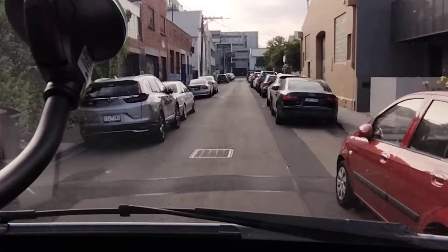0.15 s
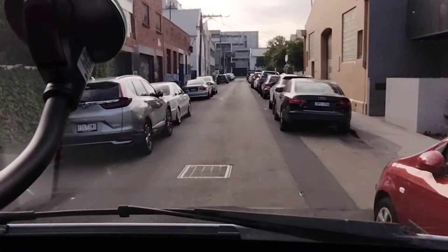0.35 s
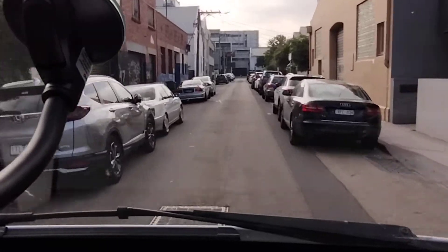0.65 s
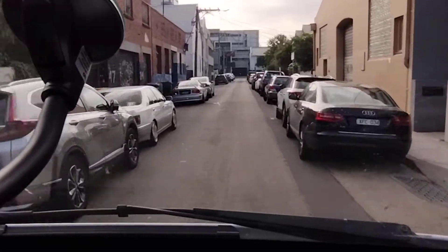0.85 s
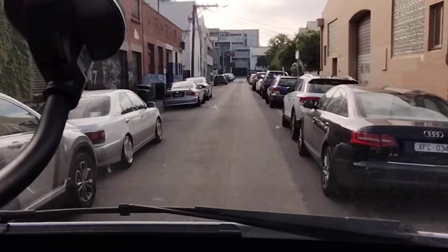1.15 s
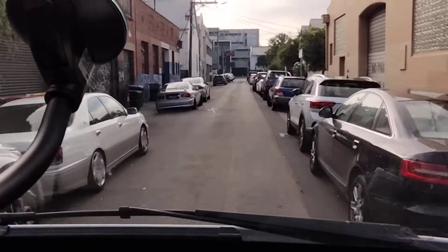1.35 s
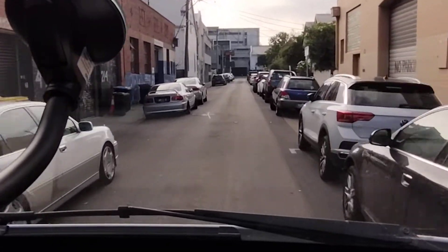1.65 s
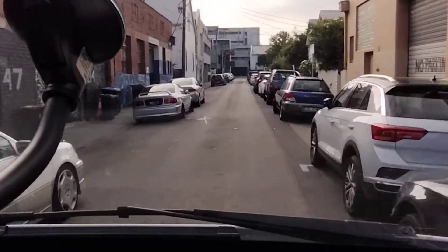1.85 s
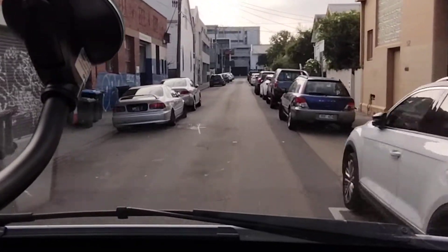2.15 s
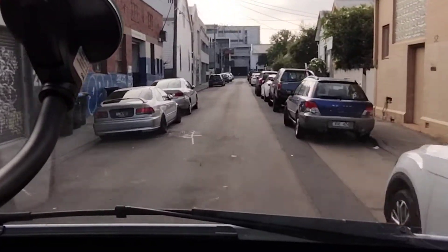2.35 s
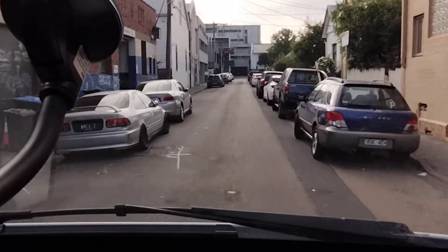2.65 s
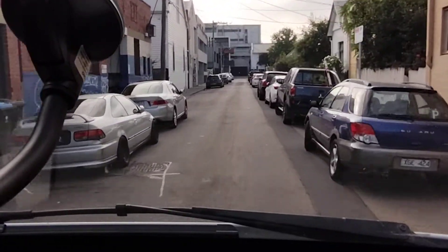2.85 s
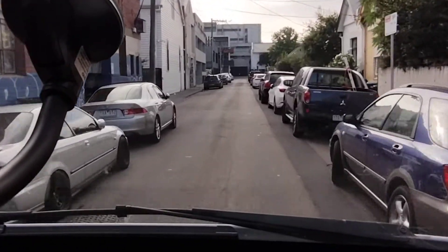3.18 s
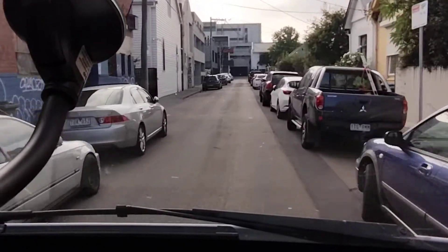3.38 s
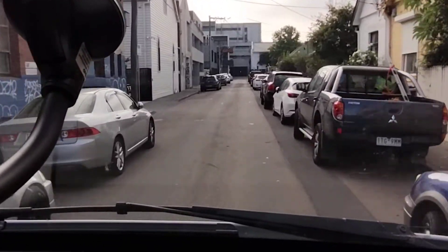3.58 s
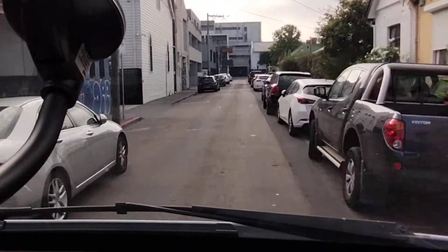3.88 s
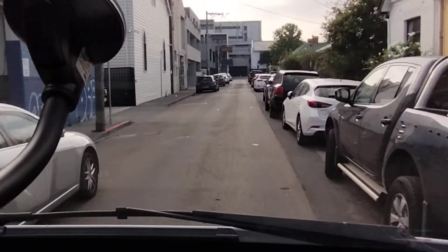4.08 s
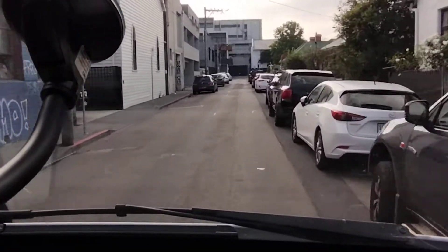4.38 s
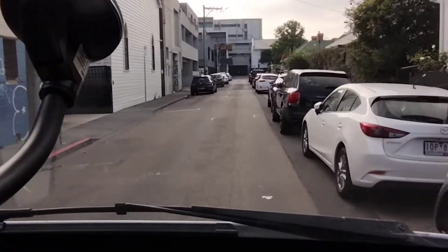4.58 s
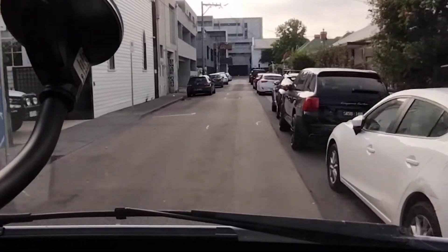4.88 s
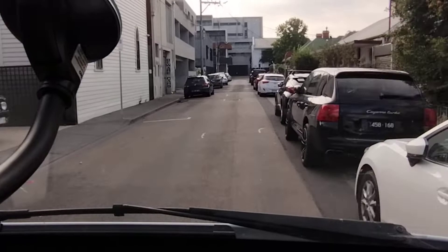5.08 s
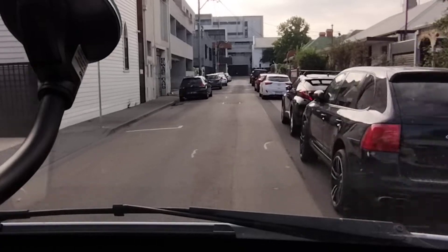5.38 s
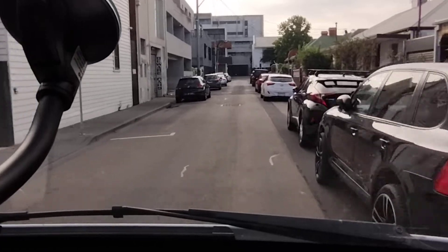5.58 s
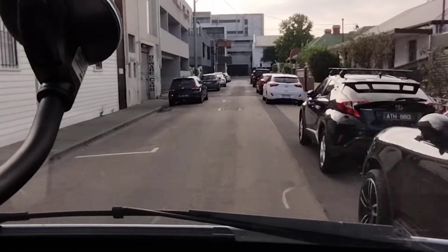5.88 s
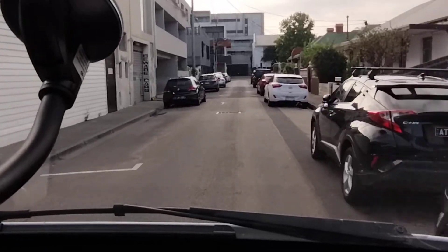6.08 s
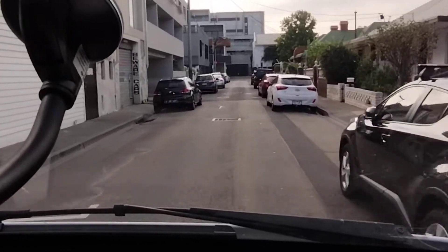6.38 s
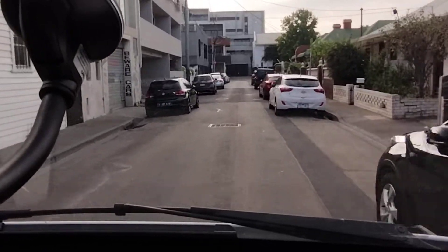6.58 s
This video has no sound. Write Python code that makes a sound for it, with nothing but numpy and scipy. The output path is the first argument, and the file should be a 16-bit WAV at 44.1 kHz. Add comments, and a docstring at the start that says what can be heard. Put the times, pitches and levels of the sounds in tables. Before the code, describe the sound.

A vehicle rolls slowly down a narrow street, heard from within the cabin. Low engine hum and muffled tyre roar sit under a thin hiss. Early bumps make the body boom and heave so hard that the whole sound briefly ducks; loose trim buzzes and rustles. After the revs fall, the ride calms, with a hollow tyre note swelling and fading and scattered small jolts.

```python
"""Narrow street, inside the cabin of a slowly rolling vehicle, one microphone behind the windscreen.
Shaped noise makes the rocking, cabin murmur, tyre drone, roar and hiss; most follow the road's roughness.
Sine tones make the engine orders, which drop once to lower revs, the whine, heaves, booms and tyre ring.
Short bursts make faint rustles and hiss, squeaks, buzzes of trim, jolts and tyre moans.
The biggest bass swings push the recorder's limiter, which ducks everything."""
import sys
import numpy as np
from scipy import signal
from scipy.fft import rfft, irfft, next_fast_len
from scipy.io import wavfile
from scipy.ndimage import uniform_filter1d

SR = 44100
rng = np.random.default_rng(int(sys.argv[2]) if len(sys.argv) > 2 else 0)


def wav_out(sig):
    """Save sig, one row per channel (or a flat mono array), as 16-bit PCM at SR to the path in sys.argv[1]."""
    wavfile.write(sys.argv[1], SR, np.round(np.clip(np.atleast_2d(sig).T, -1, 1) * 32767).astype(np.int16))


N = 297189
TIME, BINS = np.arange(N) / SR, np.fft.rfftfreq(N, 1 / SR)  # s, Hz

# All layer and event levels are set ahead of the limiter; spectra give relative levels.


def amp(db):
    """Decibels to gain."""
    return 10 ** (np.asarray(db) / 20)


def unit(x):
    """Scales to rms 1."""
    return x / np.sqrt(np.mean(x ** 2) + 1e-20)


def curves(rows):
    """Each column of a table after the time, joined by straight lines."""
    times, *columns = np.transpose(rows)
    return [np.interp(TIME, times, column) for column in columns]


def bell(x, centre, width):
    """A smooth hump, half as high at the ends of its width."""
    return .5 ** ((2 * (x - centre) / width) ** 2)


def noise(spectrum, resonances=()):
    """Noise of rms 1 with a broad colour and resonant peaks."""
    hz, db = np.transpose(spectrum)
    colour_db = np.interp(np.log(BINS + 1), np.log(hz + 1), db)
    colour_db = colour_db + sum(peak_db * bell(BINS, f, width) for f, width, peak_db in resonances)
    white = rfft(rng.standard_normal(N))
    return unit(irfft(white * amp(colour_db), N))


def drift(rate_hz):
    """A random wander of rms 1: noise whose spectrum is down to half amplitude at the rate."""
    size = next_fast_len(N, True)
    white = rfft(rng.standard_normal(size))
    lowpass = bell(np.fft.rfftfreq(size, 1 / SR), 0, 2 * rate_hz)
    return unit(irfft(white * lowpass, size)[:N])


def steadied(x, seconds):
    """Evens out the slow swells of a vibration by dividing by its local strength."""
    window = signal.windows.hann(int(seconds * SR))
    coverage = signal.fftconvolve(np.ones(N), window, "same")
    power = signal.fftconvolve(x ** 2, window, "same") / coverage
    return x / np.sqrt(abs(power) + 0.012)


def tone(hz, wander, rate_hz):
    """A vibration of rms 1 whose pitch wanders by a given share."""
    turns = np.cumsum(hz * (1 + wander * drift(rate_hz))) / SR
    return unit(np.sin(2 * np.pi * (turns + rng.random())))


def swells(rows):
    """Strength that builds and dies away with each event; overlapping events add in power."""
    return np.sqrt(sum(amp(db) ** 2 * bell(TIME, s, length) for s, length, *_, db in rows))


def fuzzy_notes(rows, width_hz):
    """Brief notes of an unevenly driven resonance, blurred in level and phase."""
    fuzz = drift(width_hz) + 1j * drift(width_hz)
    fuzz = fuzz / np.sqrt(abs(fuzz) ** 2 + .5)  # limits the strong swells
    total = np.zeros(N)
    for s, length, hz, db in rows:
        note = unit((fuzz * np.exp(2j * np.pi * hz * TIME)).real)
        total += amp(db) * bell(TIME, s, length) * note
    return total


# Road surface, rough just after a hump, then smoother: t/s, level/dB (roughness)
ROUGHNESS = [(0, 5), (.3, 2), (.8, 3.5), (1.1, -2), (1.4, 3), (1.57, 0), (1.73, 3), (2.8, 0.5), (3.5, -1),
             (3.8, 0), (4.4, -0.5), (5, 0), (5.65, 1), (5.9, -0.5), (6.74, -1.5)]


def roughness_db():
    """How hard the road drives the vehicle; 0 dB is ordinary asphalt."""
    return curves(ROUGHNESS)[0]


# Colour of the shaking body: f/Hz, level/dB
SHAKE_SPECTRUM = [(4, -35.5), (10, -17.5), (16, 1), (21, 3), (25, 0), (31, -16), (48, -37.5), (160, -110)]
# Colour of a large throbbing panel: f/Hz, level/dB
PANEL_SPECTRUM = [(25, -19), (33, 2.5), (41, -5.5), (47, -13.5), (65, -22.5), (200, -110)]


def rocking():
    """Uneven asphalt shakes the body and a large panel, as low noise that follows the roughness."""
    shake = steadied(noise(SHAKE_SPECTRUM), seconds=.1)
    panel = steadied(noise(PANEL_SPECTRUM), seconds=0.022)
    level_db = -26 + 0.87 * roughness_db()
    return amp(level_db) * (shake + amp(-3.5) * panel)


# Colour of the low, slowly wavering murmur in the cabin: f/Hz, level/dB
MURK_SPECTRUM = [(35, -25.5), (52, -4.5), (62, -6), (68, -10.5), (78, -5.5), (92, -12.5), (120, -42),
                 (400, -100)]


def murk():
    """A low murmur of the cabin air whose level wavers slowly at random."""
    level_db = -33.5 + 3.5 * drift(rate_hz=2)
    return amp(level_db) * steadied(noise(MURK_SPECTRUM), seconds=0.21)


# Bumps that set the cabin air booming: t/s, length/s (at half power), level/dB
BOOM_EVENTS = [(0, 0.029, -17), (.37, 0.045, -27), (1.02, 0.083, -24.5), (1.155, 0.1, -17.5),
               (1.38, 0.074, -27), (1.66, 0.096, -24), (2.2, .05, -26), (2.43, 0.074, -25),
               (2.71, 0.079, -23.5), (3.23, 0.15, -30), (3.89, 0.085, -24.5), (4.19, 0.035, -35),
               (4.41, 0.1, -26), (4.67, 0.082, -23), (5.49, 0.091, -28), (6.06, 0.088, -26),
               (6.55, 0.099, -22.5)]


def booms():
    """Bumps pump the lowest air mode of the cabin, a wandering tone around 69 Hz."""
    return swells(BOOM_EVENTS) * tone(69, wander=.055, rate_hz=14.04)


# Colour of the tyre casings through the suspension: f/Hz, level/dB
DRONE_SPECTRUM = [(60, -31), (98, -3), (112, -2), (140, 1), (172, -2.5), (200, -2), (225, -3.5),
                  (250, -6.5), (280, -7.5), (305, -15), (450, -34.5), (900, -87.5)]


def drone():
    """The tyre casings drone through the suspension, following the roughness."""
    level_db = -34.5 + 1.06 * roughness_db()
    return amp(level_db) * steadied(noise(DRONE_SPECTRUM), seconds=0.43)


# Colour of the tread through the panels: f/Hz, level/dB
ROAR_SPECTRUM = [(150, -22.5), (300, -0.5), (410, 0.5), (470, -2), (530, -3), (580, -8.5), (760, -6),
                 (860, -10.5), (1050, -11), (1400, -12), (1650, -20), (2500, -42), (6000, -80)]
# Cabin resonances, also heard on the air and the jolts: f/Hz, width/Hz, level/dB
CABIN_PEAKS = [(604, 39, 5), (710, 25, 4), (773, 40, 3), (1157, 32, 6.5), (1265, 32, 3), (1400, 45, 4),
               (1620, 31, 4.5), (2153, 150, 3.5), (3100, 240, 2.5), (5040, 250, 0.5)]


def roar():
    """The tread roars through the panels, fluttering with the road grain."""
    flutter_db = 0.61 * drift(rate_hz=26)
    level_db = -41.5 + 0.46 * roughness_db() + flutter_db
    return amp(level_db) * noise(ROAR_SPECTRUM, CABIN_PEAKS)


# The air inside the tyres rings on one note: t/s, level/dB
CAVITY_LEVEL = [(0, -49.5), (1.6, -51), (1.8, -39), (2.2, -39.5), (2.45, -48), (2.65, -39.5), (3.05, -41.5),
                (3.4, -38.5), (4.25, -45), (4.6, -35), (4.98, -44), (5.2, -38), (5.6, -38.5), (6.1, -47),
                (6.35, -48.5), (6.74, -38)]


def cavity():
    """The tyre air rings near 209.5 Hz, swelling and fading on its own course, much stronger after 1.7 s."""
    return amp(curves(CAVITY_LEVEL)[0]) * tone(209.5, wander=.006, rate_hz=4.87)


# Crank rate, dropping once as at a gear change: t/s, f/Hz
CRANK_RATE = [(0, 27.6), (1.5, 27.8), (1.75, 22.6), (2.45, 20.15), (5, 20.2), (6.74, 20.15)]
# Engine orders: multiple of the crank rate, full from t/s, full until t/s, level/dB
ENGINE_ORDERS = [(4, 0, 1.5, -37.5), (5, 0, 1.5, -41), (10, 0, 1.55, -43.5), (11, 0, 1.5, -52),
                 (12, 0, 1.5, -51), (14, 0, 1.5, -52), (2, 2.3, 6.8, -32), (6, 2.4, 6.8, -46),
                 (8, 2.3, 3.1, -43), (8, 3.25, 6.8, -40.5), (14, 2.4, 6.8, -46), (15, 2.4, 6.8, -54)]


def engine():
    """Crank orders, each wavering a little; the cabin picks out other ones once the revs drop."""
    crank_hz = curves(CRANK_RATE)[0]
    turns = np.cumsum(crank_hz * (1 + .004 * drift(rate_hz=4))) / SR
    fade_s = 0.079
    hum = np.zeros(N)
    for order, start, end, db in ENGINE_ORDERS:
        waver_db = 1.5 * drift(rate_hz=5)
        inside_s = np.minimum(TIME - start, end - TIME)  # negative outside the order's span
        heard = np.clip(1 + inside_s / fade_s, 0, 1)
        wave = unit(np.sin(2 * np.pi * (round(order) * turns + rng.random())))
        hum += heard * amp(db + waver_db) * wave
    return hum


def whine():
    """A thin, wavering drivetrain tone around 516 Hz that holds, then dies away."""
    hold_s, fade_db_per_s = 1.45, 45
    level_db = -51 - fade_db_per_s * np.maximum(TIME - hold_s, 0)
    waver = unit(amp(3 * drift(rate_hz=18)))
    return amp(level_db) * waver * tone(516, wander=.009, rate_hz=25)


# Colour of the airy hiss: f/Hz, level/dB
HISS_SPECTRUM = [(700, -26), (1300, -2.5), (1600, -2), (1850, 3), (1980, -0.5), (2200, -0.5), (2500, -2.5),
                 (3100, -6), (3600, -6.5), (4500, -10.5), (5500, -11.5), (7500, -13), (9000, -22)]


def air():
    """Hiss of vents and street: noise that flutters slightly and partly follows the roughness."""
    flutter_db = 0.6 * drift(rate_hz=50)
    level_db = -50.5 + 0.31 * roughness_db() + flutter_db
    return amp(level_db) * noise(HISS_SPECTRUM, CABIN_PEAKS)


# Dips that make the body heave: t/s, length/s (at half power), f/Hz, level/dB
HEAVE_EVENTS = [(.11, 0.064, 25, -9.5), (.255, 0.042, 25, -14.5), (.38, 0.069, 22.8, -13.5),
                (.46, 0.042, 23.7, -13.5), (.58, 0.057, 22.2, -13), (.69, 0.049, 21, -16),
                (.8, 0.095, 20.5, -9), (.97, .055, 20.4, -11), (1.095, 0.086, 22.4, -9.5),
                (1.228, 0.062, 18, -9), (1.47, 0.046, 23, -6.5), (1.58, 0.068, 23.4, -7.5),
                (1.7, 0.062, 20.4, -16), (1.8, 0.069, 17.8, -12.5), (1.89, 0.055, 19.8, -11.5),
                (1.99, 0.053, 26, -15), (2.255, 0.041, 29, -16), (2.4, .07, 22, -17.5),
                (2.57, 0.069, 23, -14.5), (2.72, 0.12, 22, -13), (2.98, 0.12, 20.8, -15.5),
                (3.2, 0.045, 21, -11.5), (3.285, 0.06, 19.5, -16), (3.49, 0.064, 20, -15.5),
                (3.68, 0.039, 22, -18), (3.81, 0.065, 22, -13.5), (3.91, 0.062, 19, -13),
                (4.02, .05, 20, -19), (4.18, 0.037, 24.8, -17), (4.27, 0.039, 17, -12),
                (4.35, 0.054, 21.2, -10), (4.46, 0.033, 21.6, -12.5), (4.76, 0.033, 26.5, -14),
                (4.87, .05, 23, -23), (5.2, 0.072, 21, -13), (5.29, .05, 21.8, -12), (5.79, .055, 22, -14),
                (5.97, 0.14, 20, -22), (6.15, 0.063, 22.2, -21), (6.41, .16, 20.6, -16.5),
                (6.7, 0.062, 22, -17.5)]


def heaves():
    """Dips in the road make the body bounce; its rate glides between events and wanders."""
    bounce_hz = curves(HEAVE_EVENTS)[1]
    return swells(HEAVE_EVENTS) * tone(bounce_hz, wander=.1, rate_hz=20)


# The first rub catches: t/s, length/s (at half height), f/Hz, level/dB
SQUEAK_EVENTS = [(.135, .04, 4980, -60), (.187, .05, 4920, -57)]


def squeaks():
    """The first rub catches and squeaks faintly, as two blurred high notes."""
    return fuzzy_notes(SQUEAK_EVENTS, width_hz=120)


# Bursts of hiss: t/s, length/s (at half height), level/dB, ring level/dB relative to the hiss
RUSTLE_EVENTS = [(0.205, 0.12, -50.5, -11), (.33, .05, -54, -16), (1.038, 0.028, -54.5, -20),
                 (1.107, 0.016, -48.5, -19), (1.16, .03, -54, -16), (1.2, 0.014, -46.5, -13),
                 (1.3, .02, -51.5, -18), (1.38, 0.092, -59, -24), (1.506, 0.068, -47, -8.5),
                 (1.654, 0.055, -59, -20), (1.725, 0.12, -49, -12), (1.863, 0.051, -50, -7),
                 (1.96, 0.1, -49, -10), (3.824, 0.036, -61, -6), (4.428, 0.047, -54, -9),
                 (4.576, 0.17, -55, -12), (4.758, 0.047, -58.5, -3), (4.925, 0.18, -55.5, -5),
                 (5.706, 0.15, -52.5, -7)]
# Colour of the bursts: f/Hz, level/dB
RUSTLE_SPECTRUM = [(500, -27), (1500, 11.5), (3000, 1.5), (4200, -0.5), (6000, 0), (7500, -1.5),
                   (9000, -6.5)]
# Colour of their ring near 5 kHz: f/Hz, level/dB
RING_SPECTRUM = [(3500, -34.5), (4600, -11), (5000, -8), (5400, -10), (7000, -24.5)]


def rustles():
    """Short grainy bursts of hiss: soft rubs, and near 1.1 s hiss surging back as the limiter lets go."""
    hiss, ring = noise(RUSTLE_SPECTRUM), noise(RING_SPECTRUM)
    bursts = np.zeros(N)
    for s, length, db, ring_db in RUSTLE_EVENTS:
        bursts += amp(db) * bell(TIME, s, length) * (hiss + amp(ring_db) * ring)
    grain_db = 2.3 * drift(rate_hz=120)
    return bursts * amp(grain_db)


# Loose trim on the bumps: t/s, length/s (at half height), f/Hz, level/dB
BUZZ_EVENTS = [(1.002, 0.029, 612, -44.5), (1.09, 0.058, 405, -44.5), (1.28, .1, 392, -48),
               (1.41, 0.054, 410, -47)]


def buzzes():
    """Loose trim buzzes on the bumps, as short blurred notes."""
    return fuzzy_notes(BUZZ_EVENTS, width_hz=23)


# Knocks from road seams: t/s, length/s (at half height), thud level/dB, panel level/dB
JOLT_EVENTS = [(1.002, 0.011, -41, -37), (1.11, 0.088, -24, -44.5), (1.208, 0.0083, -25, -39),
               (1.386, 0.11, -29.5, -46.5), (1.678, 0.047, -46, -38), (2.492, 0.033, -51, -40.5),
               (3.011, 0.015, -37, -43), (3.176, 0.02, -33, -53), (4.114, 0.018, -31, -50),
               (5.237, 0.014, -36, -47), (5.663, 0.043, -27.5, -65), (6.057, 0.035, -26.5, -44)]
# Colour of the suspension thud: f/Hz, level/dB
THUD_SPECTRUM = [(60, -23), (100, -2), (130, 2), (185, 0.5), (230, -19.5), (320, -23.5), (600, -76.5)]


def jolts():
    """A seam in the road briefly drives the suspension and the panels harder."""
    thud = steadied(noise(THUD_SPECTRUM), seconds=0.077)
    panel = noise(ROAR_SPECTRUM, CABIN_PEAKS)
    knocks = np.zeros(N)
    for s, length, thud_db, panel_db in JOLT_EVENTS:
        knocks += bell(TIME, s, length) * (amp(thud_db) * thud + amp(panel_db) * panel)
    return knocks


# Tyre casings moaning: t/s, length/s (at half height), f/Hz, level/dB
MOAN_EVENTS = [(1.719, 0.19, 135.5, -30.5), (1.792, .18, 260.6, -39.5), (2.204, 0.29, 271.8, -40),
               (2.285, 0.33, 151.1, -32)]


def moans():
    """The tyre casings moan briefly on narrow, slowly wavering notes."""
    return fuzzy_notes(MOAN_EVENTS, width_hz=2.73)


def scene():
    """Everything meets at one microphone behind the windscreen."""
    body = rocking() + murk() + booms() + heaves()
    tyres = drone() + roar() + cavity() + moans()
    drivetrain = engine() + whine()
    cabin = air() + squeaks() + rustles() + buzzes()
    return (body + tyres + jolts() + drivetrain + cabin)[None]


def record(dry):
    """A quick limiter ducks everything under the biggest bass swings; then the band limit."""
    threshold_db, squeeze = -10, 0.68  # squeeze: share of the excess taken away
    recovery_db_per_s, edge_hz = 104, 7850
    level_db = 20 * np.log10(abs(dry[0]) + 1e-9)
    over_db = squeeze * np.maximum(level_db - threshold_db, 0)
    recovery_db = TIME * recovery_db_per_s  # dB regained since the start
    duck_db = np.maximum.accumulate(over_db + recovery_db) - recovery_db
    # two short averages round off the gain steps
    smooth_db = uniform_filter1d(uniform_filter1d(duck_db, size=200), size=200)
    limited = dry / amp(smooth_db)
    lowpass = signal.firwin(191, edge_hz, window=("kaiser", 8), fs=SR)
    return signal.oaconvolve(limited, lowpass[None], "same")


dry = scene()
out = record(dry)
wav_out(out)
```